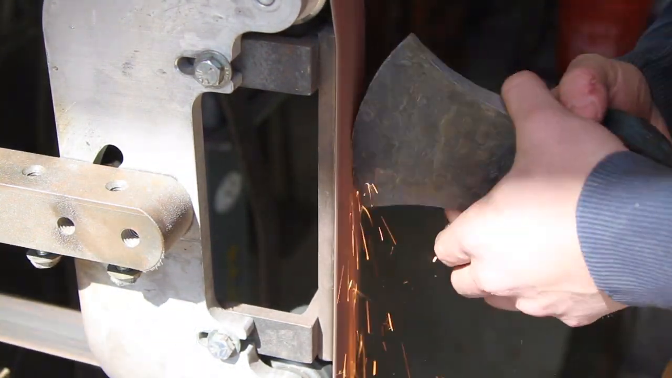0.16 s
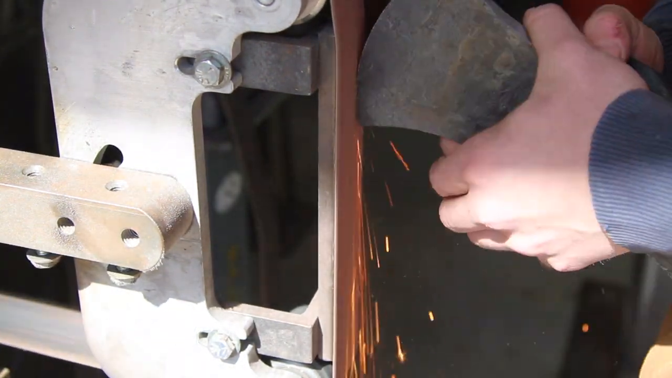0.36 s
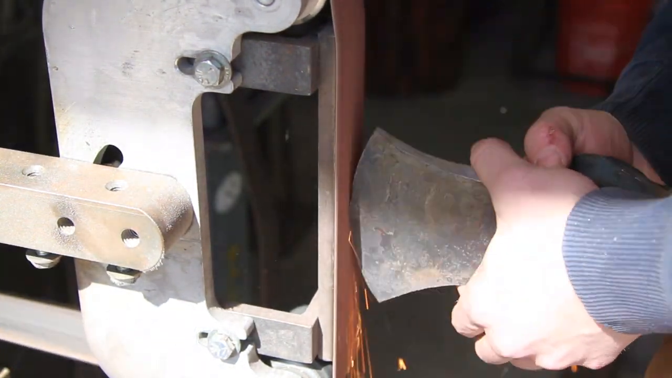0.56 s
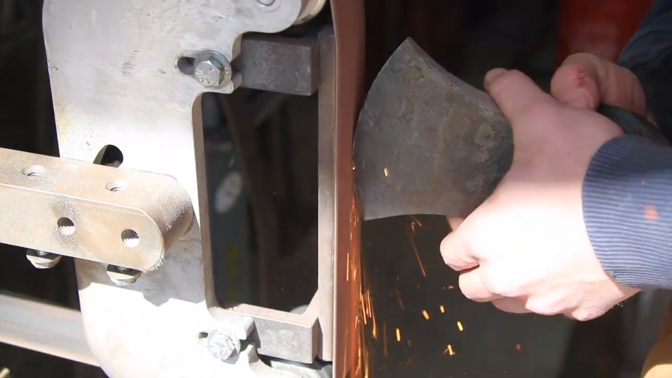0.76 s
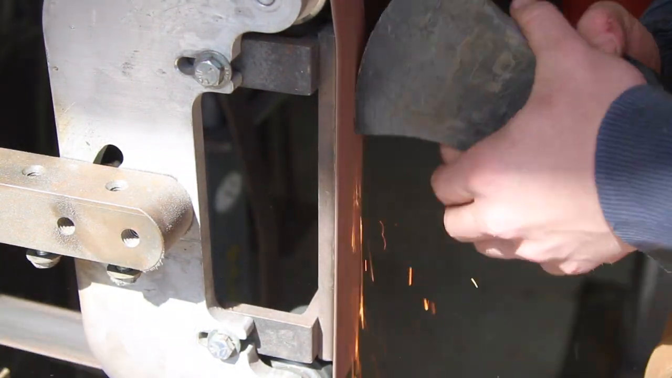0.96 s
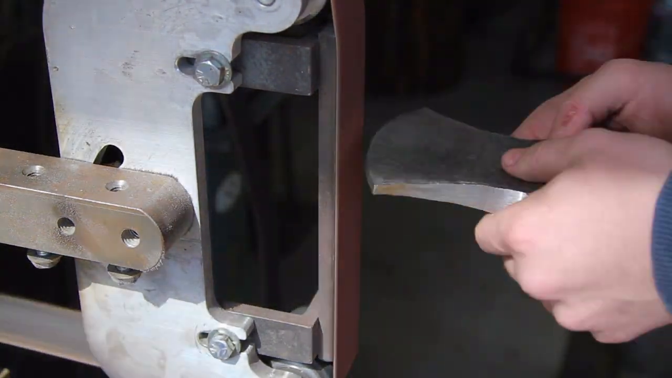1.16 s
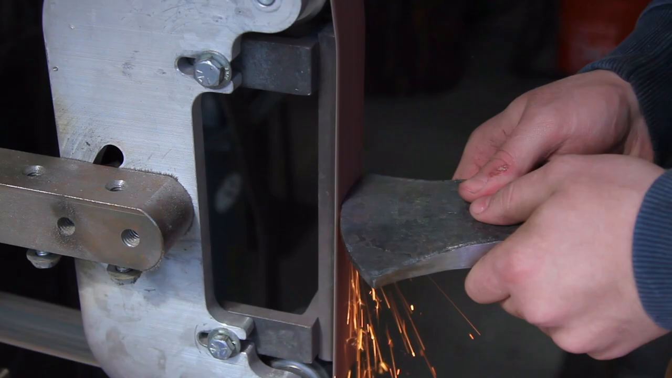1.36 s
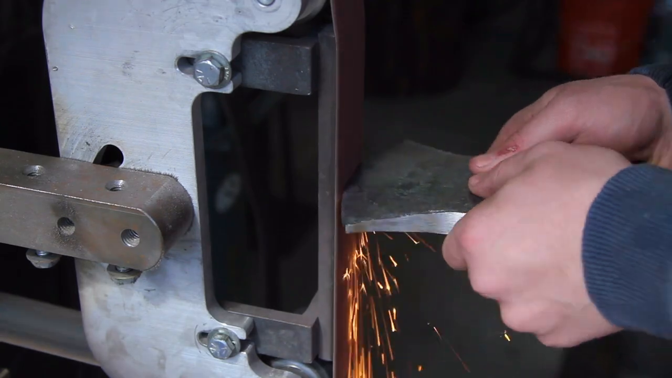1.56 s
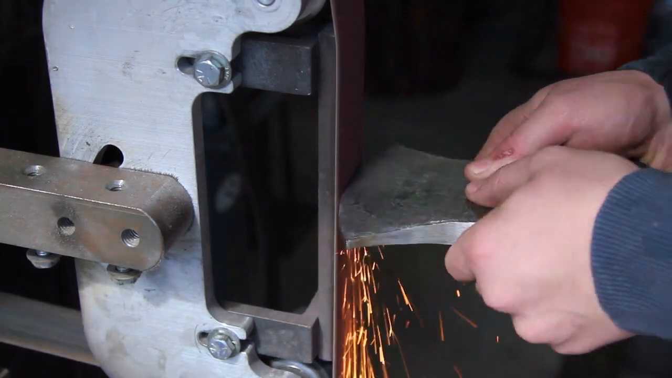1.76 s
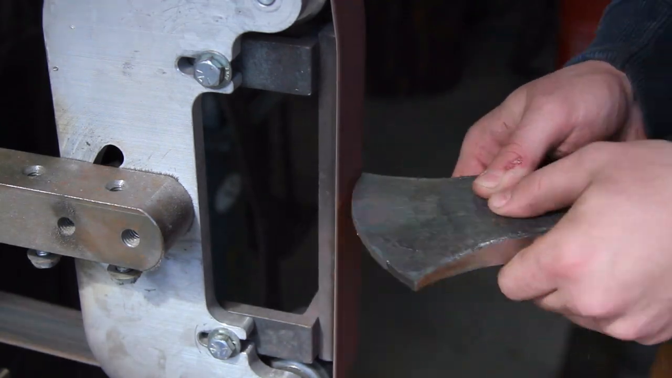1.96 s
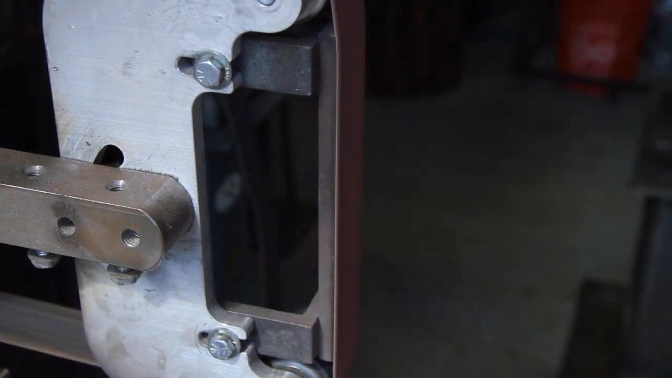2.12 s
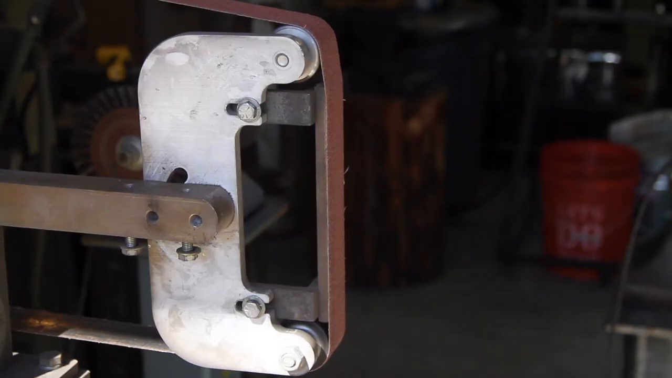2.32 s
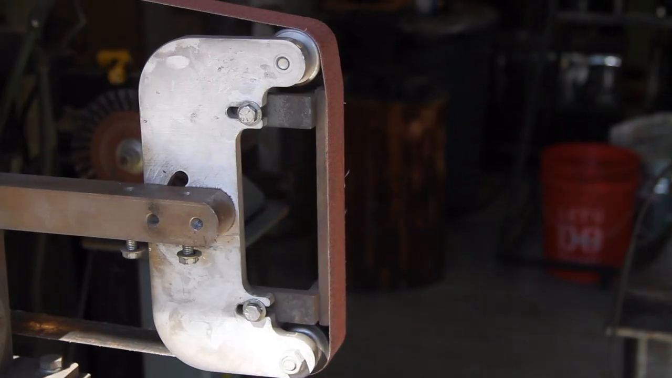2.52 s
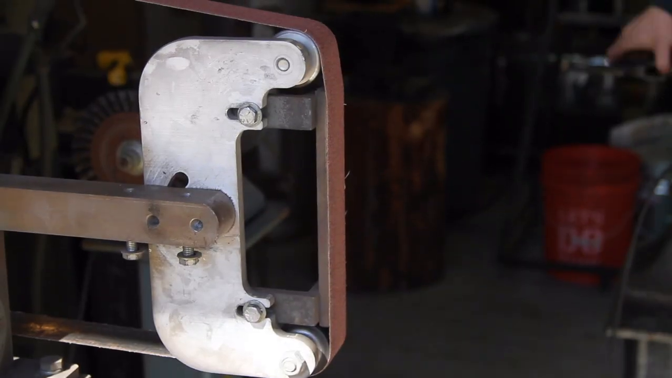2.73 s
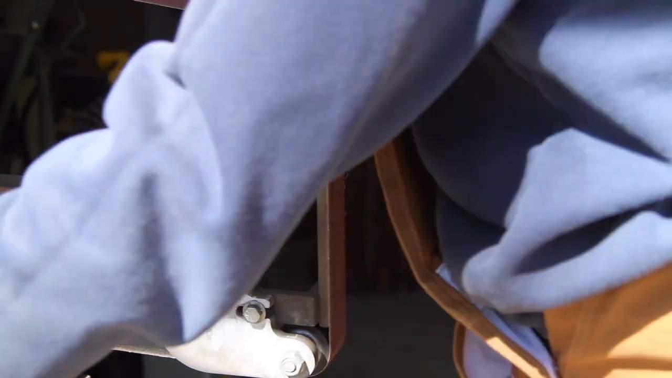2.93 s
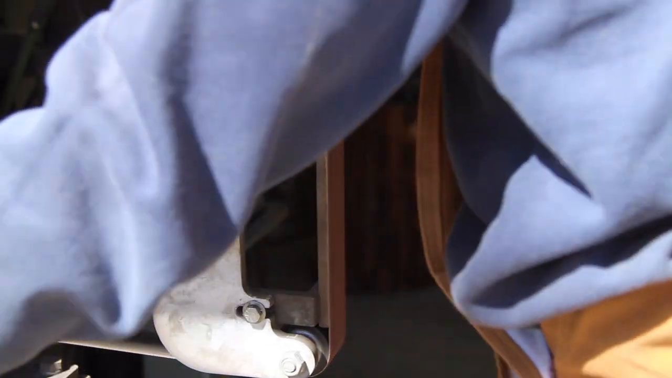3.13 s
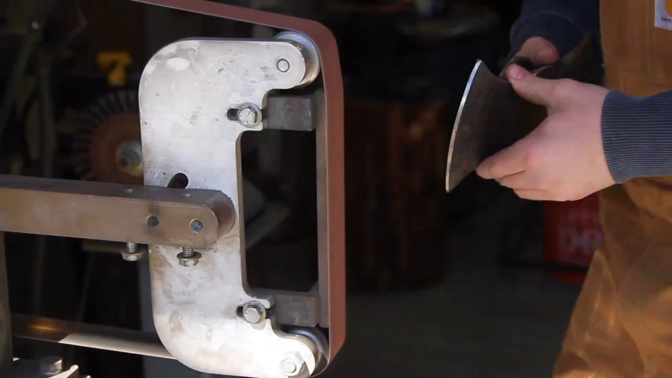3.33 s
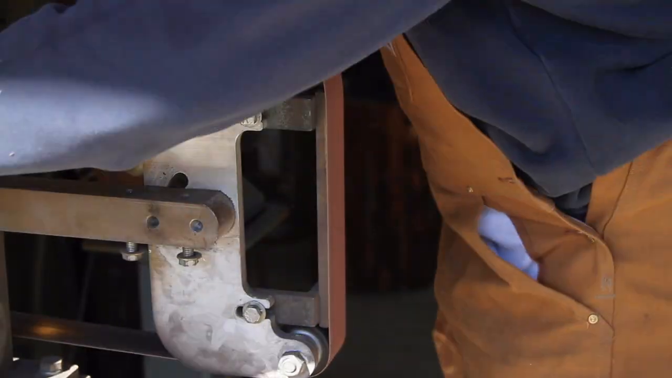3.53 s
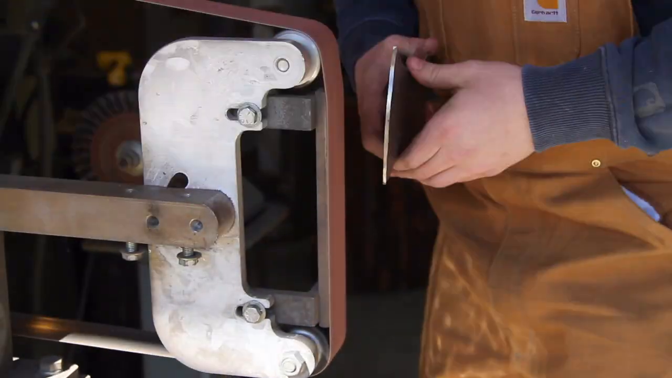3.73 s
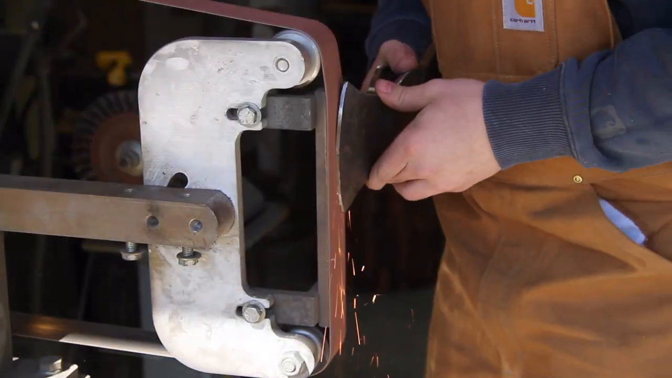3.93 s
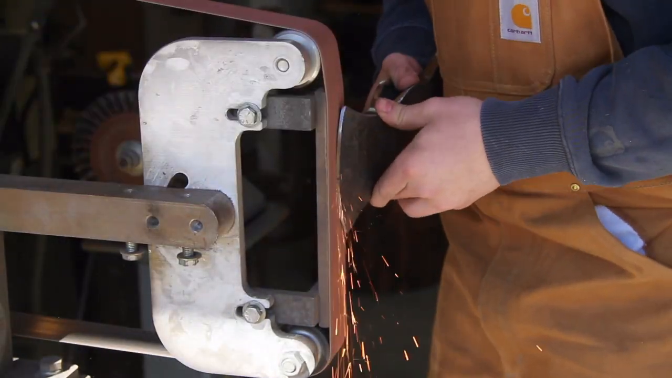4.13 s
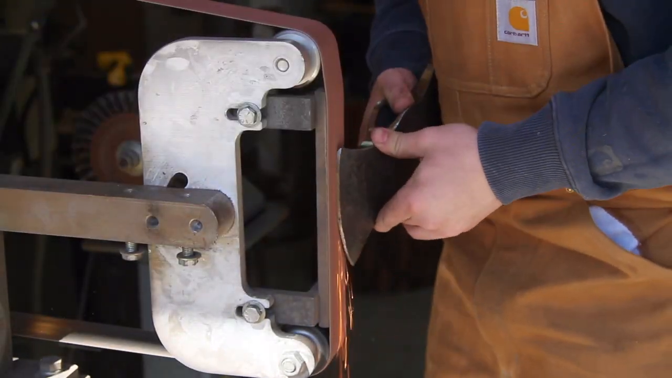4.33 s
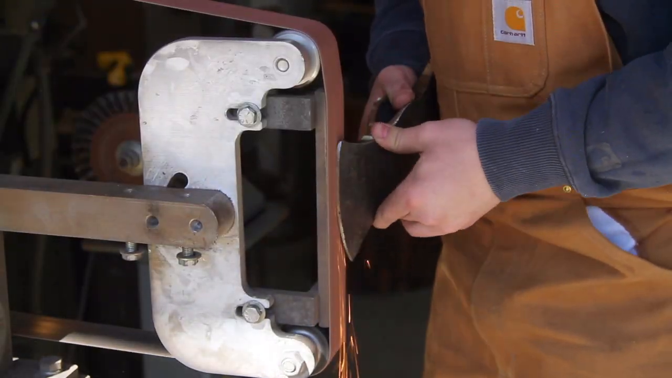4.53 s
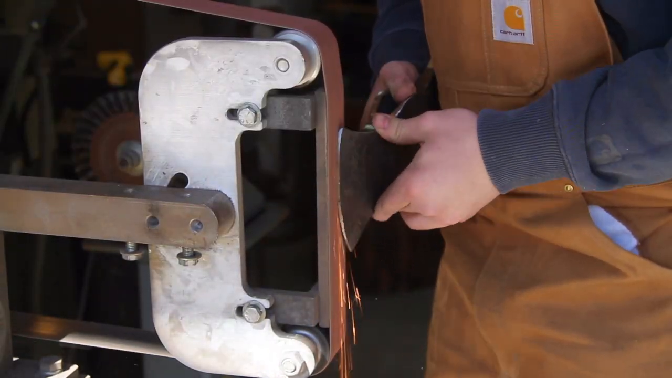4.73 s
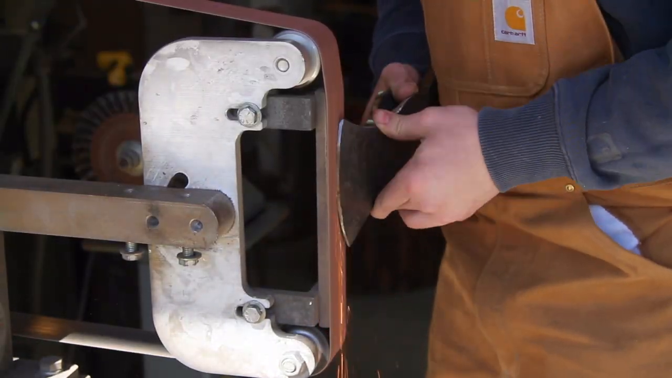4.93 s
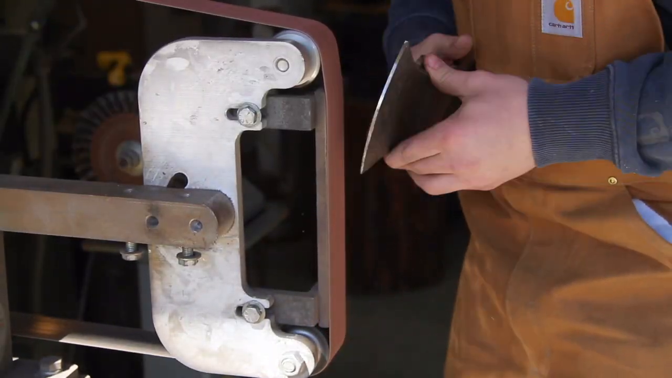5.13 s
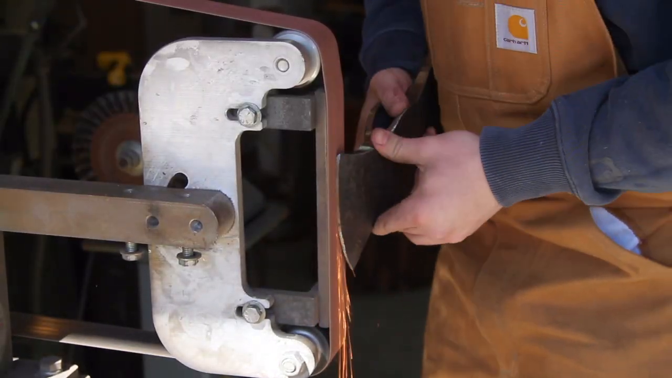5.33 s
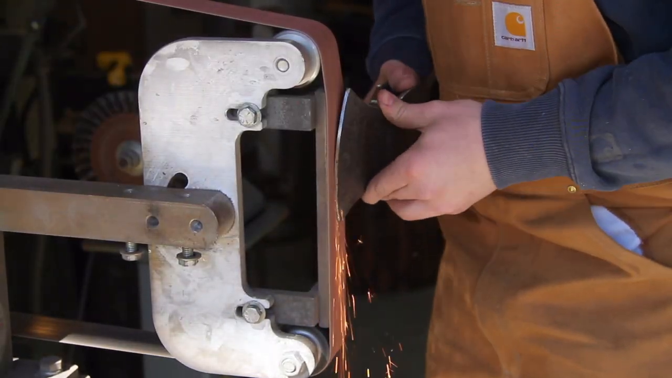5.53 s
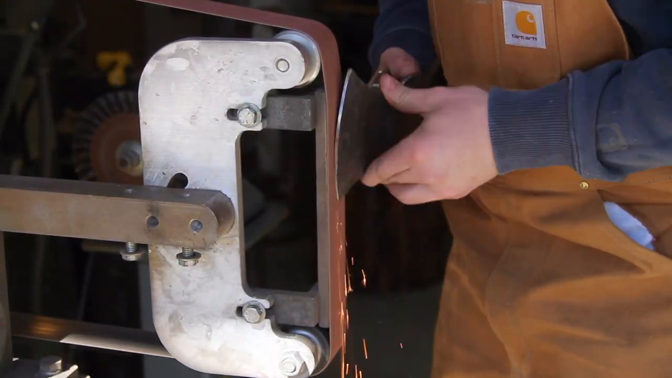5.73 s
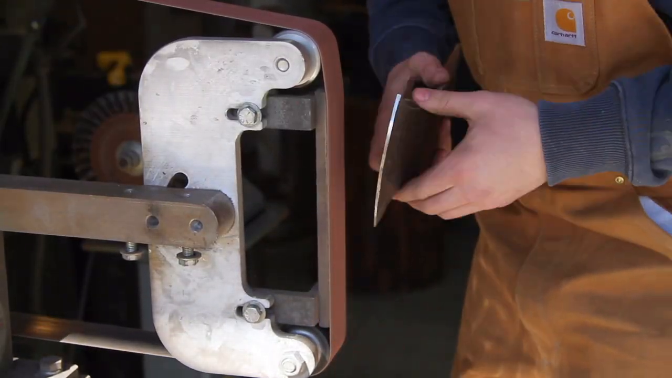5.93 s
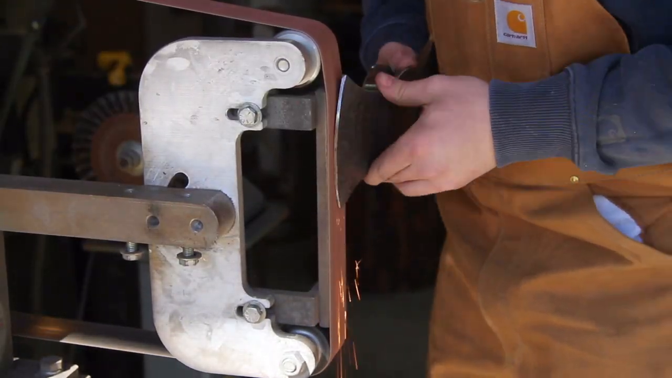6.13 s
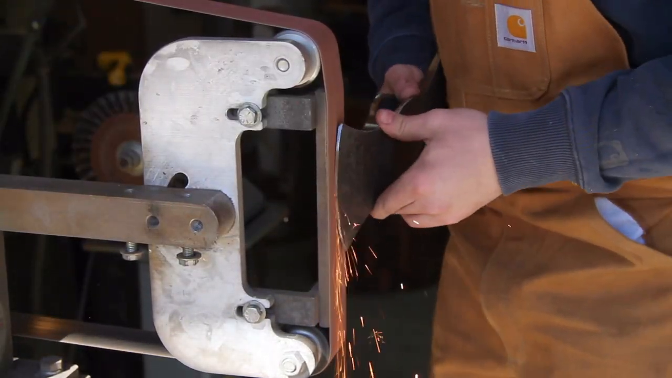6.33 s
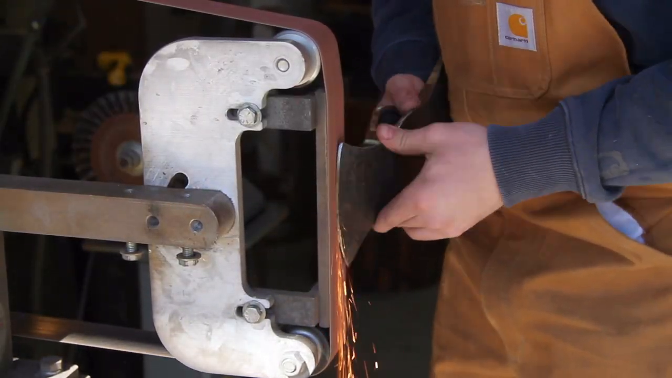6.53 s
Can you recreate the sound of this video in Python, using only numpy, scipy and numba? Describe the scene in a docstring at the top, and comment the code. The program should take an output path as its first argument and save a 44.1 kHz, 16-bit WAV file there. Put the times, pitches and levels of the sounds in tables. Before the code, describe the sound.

In an open workshop, a belt grinder runs with a steady hiss and whine while a steel axe head rasps against it in two passes. The machine cuts out, leaving faint hum, sleeve rustles and small knocks. With a click it comes back, pitched higher. A short squeal leads into more grinding, while gusts of wind rumble on the mono microphone and overload it.

```python
"""Grinding an axe head

In an open workshop, abrasive grains on a running belt excite the resonances of the grinder's frame and
of an axe head, pressed on flat and then edge-on. The motor cuts out, leaving hum, knocks and sleeve
rustle. Just after this pause, whine and resonances sound about a fourth higher. One short squeal and
more grinding follow, while gusts of wind overload the mono microphone."""
import sys
import numpy as np
from scipy import signal
from scipy.fft import rfft, irfft, next_fast_len
from scipy.io import wavfile
from scipy.ndimage import uniform_filter1d
from numba import njit

SR = 44100
rng = np.random.default_rng(int(sys.argv[2]) if len(sys.argv) > 2 else 0)


def file_out(sig):
    """Save sig as 16-bit WAV at sys.argv[1]."""
    # one column per channel
    cols = np.atleast_2d(sig).T
    # limit, then scale
    lim = np.clip(cols, -1, 1)
    pcm = np.round(lim * 32767).astype(np.int16)
    wavfile.write(sys.argv[1], SR, pcm)


N = 294145
T = np.arange(N) / SR
STOP_S, START_S, SHIFT_S = 2.306, 3.155, 3.193  # the pause begins, it ends, the sound turns higher

# Passes of the steel along the belt, in three lists: flat, edge-on and after the pause.
# Each row: start and end in seconds, first and last level in dB.
STEEL_PASSES = [
    [(.2, .27, -32, -34), (.27, .4, -29.5, -29.5), (.4, 1.105, -30.5, -29.5)],
    [(1.255, 2.025, -30, -29.5)],
    [(3.98, 4.45, -29, -33.5), (4.45, 5.1, -30, -31), (5.1, 5.8, -33, -30.5), (5.8, 6.2, -39.5, -29.5),
     (6.2, 6.7, -30.5, -28)],
]


def undb(db):
    """Amplitude ratio for a level in decibels."""
    return 10 ** (np.asarray(db) / 20)


def level(x, db):
    """The signal scaled to an rms level in dB."""
    return x * undb(db) / np.sqrt(np.mean(x ** 2))


def gain(*spans):
    """Envelope with 8 ms fades. Each span: start and end in seconds, first and last level in dB."""
    envelope = sum(undb(np.interp(T, [start, end], [first_db, last_db])) * (T >= start) * (T < end)
                   for start, end, first_db, last_db in spans)
    return uniform_filter1d(envelope, size=350)


@njit
def svf(x, hz, width):
    """Second-order resonator: a state-variable band-pass with unit gain at its moving centre."""
    y, band_state, low_state = np.empty(len(x)), 0., 0.
    for i in range(len(x)):
        g, damping = np.tan(np.pi * hz[i] / SR), width / hz[i]
        band = (band_state + g * (x[i] - low_state)) / (1 + g * (g + damping))
        band_state = 2 * band - band_state
        low_state += 2 * g * band
        y[i] = damping * band
    return y


def walk(rate):
    """Random modulation: ramps between `rate` random values a second, with a spread near 1."""
    hold = int(SR / rate)
    steps = np.repeat(rng.standard_normal(N // hold + 1), hold)
    return 1.49 * uniform_filter1d(steps, hold)[:N]


def coloured(points, x=None):
    """Spectral shaping of noise, or x, to unit rms. Each point: frequency in Hz, relative level in dB."""
    hz, db = np.transpose(points)
    x = rng.standard_normal(N) if x is None else x
    size = next_fast_len(N)
    f = np.maximum(np.arange(size // 2 + 1) * SR / size, 1.)
    response = undb(np.interp(np.log(f), np.log(hz), db))
    return level(irfft(rfft(x, size) * response, size)[:N], 0)


def grit(scatter_db, count=N):
    """Granular excitation: noise whose samples vary widely in strength, like the impacts of grains."""
    return rng.standard_normal(count) * undb(scatter_db * rng.exponential(size=count))


def ringing(modes, hiss, hiss_db, flicker_db, scatter_db):
    """Forced vibration: grains drive flickering resonances over a broad hiss; unit rms."""
    drive = grit(scatter_db)
    size = next_fast_len(N)
    f = np.arange(size // 2 + 1) * SR / size
    spectrum, out = rfft(drive, size), 0
    for hz, width, db in modes:
        mode = irfft(spectrum / (1 + (2 * (f - hz) / width) ** 2), size)[:N]
        flicker = walk(14) + 60 / width * walk(6)  # sharp resonances flare more
        out = out + undb(db + flicker_db * flicker) * mode
    return level(level(out, 0) + undb(hiss_db) * coloured(hiss, drive), 0)


def workshop():
    """Ambient noise: drifting outdoor hiss, a wavering hum and a low thump that decays after the stop."""
    # Distant hiss. Each row: frequency in Hz, relative spectrum level in dB.
    hiss_spectrum = [(25, -4.5), (80, -15.5), (141, -19), (300, -16.5), (500, -19), (820, -12.5),
                     (1500, -14), (4000, -16), (8500, -16.5), (11000, -24.5), (16000, -26)]
    # Hum. Each row: frequency in Hz, rms level in dB.
    hum_tones = [(532.9, -76), (802.6, -80)]
    hum = sum(undb(db + 3 * walk(25)) * np.sqrt(2) * np.sin(2 * np.pi * hz * T + .5 * walk(25))
              for hz, db in hum_tones)
    decay = np.where(T > STOP_S, undb(-46) * np.exp(-np.abs(T - STOP_S) / 0.057), 0)
    thump = coloured([(10, -4.0), (50, -11), (150, -18), (400, -37), (16000, -90)])
    hiss = coloured(hiss_spectrum) * undb(-60 + 1.306 * walk(4.14) + 0.87 * walk(30.77))
    return hiss + hum + decay * thump


def rustles():
    """Friction noise of a sleeve: grainy puffs of band noise under Gaussian envelopes."""
    # Each row: peak time and length in seconds, centre and bandwidth in Hz, level in dB.
    puffs = [(2.449, 0.0076, 4500, 5000, -51), (2.454, .014, 7000, 8000, -57),
             (2.473, 0.016, 400, 500, -60), (2.525, .03, 9000, 8000, -57), (2.597, .006, 7000, 9000, -45),
             (2.607, 0.014, 9500, 7000, -51), (2.657, .014, 9000, 9000, -56),
             (2.671, .005, 7000, 8000, -53), (2.725, .025, 10000, 8000, -63),
             (2.895, .015, 12000, 6000, -65), (2.925, .016, 6000, 6000, -59),
             (2.986, 0.022, 13500, 4000, -54), (3.012, .02, 14000, 5000, -55),
             (3.025, .018, 10000, 8000, -55)]
    out = np.zeros(N)
    for peak_s, length, hz, width, db in puffs:
        i = int((peak_s - .06) * SR)
        t = T[i:i + 6000] - peak_s
        puff = svf(grit(2.6, len(t)), np.full(len(t), float(hz)), float(width))
        out[i:i + len(t)] += level(puff, db) * np.exp(-(2 * t / length) ** 2 / 2)
    return out


def knocks():
    """Impact excitation: small knocks and the switch each give a tick, damped modes and a noisy tail."""
    # Each row: start in seconds, level in dB, pitch in Hz, relative level of the tick in dB.
    impacts = [(2.6197, -36, 1700, 3), (2.6415, -35.5, 1500, 1), (2.6903, -49, 2200, -3),
               (2.7005, -52, 2500, -3), (2.9512, -36.5, 1600, -9), (2.9629, -37, 2200, 4),
               (3.1552, -29, 3000, 1)]
    # Each row: multiple of the pitch, relative level in dB, time to decay by 60 dB in seconds.
    modes = [(1, -5, .012), (1.5, -7, 0.009), (2.3, -6, .009)]
    out, t = np.zeros(N), T[:3000]
    for start, db, hz, tick_db in impacts:
        noise = rng.standard_normal(len(t))
        ring = sum(undb(mode_db - 60 * t / t60) * np.sin(2 * np.pi * ratio * hz * t)
                   for ratio, mode_db, t60 in modes)
        tick = svf(noise, np.full(len(t), 5000.), 7000.) * undb(tick_db - 60 * t / .005)
        tail = svf(noise, np.full(len(t), 1.1 * hz), 2500.) * undb(-3 - 60 * t / 0.065)
        i = int(start * SR)
        out[i:i + len(t)] += undb(db) * (ring + tick + tail)
    bass_cut = signal.butter(2, 550, "high", fs=SR, output="sos")  # small bodies radiate little bass
    return signal.sosfilt(bass_cut, out)


def wind():
    """Turbulence: eddies at the microphone port give a fluttering rumble and a brighter rush."""
    # Each row: peak time in seconds, level in dB, rise and fall in seconds, brightness in dB.
    gusts = [(3.455, -47, 0.031, 0.045, -3), (3.79, -34, 0.035, 0.037, -19),
             (3.89, -35.5, 0.039, 0.043, -15), (4.2, -41, 0.11, 0.038, -4),
             (4.25, -32.5, 0.018, 0.039, -0.5), (4.31, -21.5, 0.054, 0.1, -10),
             (4.395, -28, 0.054, 0.032, 7.5), (4.435, -24.5, 0.029, 0.052, -5),
             (4.507, -34.5, 0.013, 0.016, 7), (4.55, -34.5, 0.035, 0.086, -2),
             (4.65, -32.5, 0.11, 0.095, -18), (4.77, -38.5, 0.088, 0.081, -1),
             (4.889, -22.5, 0.021, 0.025, -10), (5.001, -31, 0.033, 0.055, -20),
             (5.056, -23, 0.017, 0.021, -6.5), (5.13, -25.5, 0.067, .06, -9), (5.25, -32, 0.057, 0.099, -9),
             (5.362, -32.5, 0.027, 0.03, -17), (5.515, -29.5, .06, 0.086, -2.5),
             (5.72, -49.5, 0.024, 0.15, 0), (6.02, -42, 0.043, 0.034, -8)]
    edge_db = 11.5  # drop in level one rise before or one fall after the peak
    flutter = undb(2.6 * walk(90))
    rumble = coloured([(20, 1), (100, 1.5), (450, 0.1), (900, -8.5), (1800, -21), (4000, -45),
                       (16000, -70)])
    rush = coloured([(200, -32), (700, 7), (1200, 3.0), (2000, -6.5), (3500, -18), (16000, -60)])
    rumble_gain, rush_gain = 0, 0
    for peak_s, peak_db, rise, fall, bright_db in gusts:
        db = peak_db - edge_db * np.abs((T - peak_s) / np.where(T < peak_s, rise, fall)) ** 1.32
        rumble_gain += undb(db)
        rush_gain += undb(db + bright_db + np.minimum(0.82 * (db + 40), 0))  # the rush grows faster
    return flutter * (rumble_gain * rumble + rush_gain * rush)


def squeal():
    """Frequency modulation: a short gliding tone roughens into scraping noise on the same pitch."""
    # Each row: time in seconds, pitch in Hz, level in dB.
    glide = [(3.909, 1830, -35), (3.914, 1850, -32), (3.931, 1840, -32), (3.936, 1700, -40),
             (3.944, 1480, -35), (3.955, 1330, -36), (3.965, 1420, -43), (3.977, 1750, -40),
             (3.985, 1800, -47)]
    times, pitches, db = np.transpose(glide)
    hz = np.interp(T, times, pitches)
    sounding = (T >= times[0]) * (T < times[-1])
    envelope = uniform_filter1d(undb(np.interp(T, times, db)) * sounding, size=350)
    roughness = np.interp(T, [3.925, 3.94], [.4, .88])
    jittered_hz = hz * (1 + .04 * roughness * walk(400))
    tone = np.sqrt(2) * np.sin(2 * np.pi * np.cumsum(jittered_hz) / SR)
    scrape = level(svf(svf(rng.standard_normal(N), hz, 700.), hz, 700.), 0)
    shimmer = undb(4 * roughness * walk(300))
    return envelope * (np.sqrt(1 - roughness ** 2) * shimmer * tone + roughness * scrape)


def harmonics(hz, orders):
    """Harmonic series: multiples of one frequency, each wavering a little in strength."""
    return sum(undb(db + 1.4 * walk(9.7)) * np.sqrt(2) * np.sin(2 * np.pi * (k * hz * T + rng.random()))
               for k, db in orders)


def motor_whine():
    """Periodic vibration: a whine of harmonic tones, heard a fourth higher after the pause."""
    # Each row: harmonic number, relative level in dB.
    low_orders = [(1, -10), (3, -3), (4, -0.5), (5, -3)]
    high_orders = [(3, -3.5), (4, 0.5), (5, -2), (6, -4), (7, -3), (9, -13), (11, -11)]
    # Envelopes of the low whine (louder once the steel lifts off), the high whine and its fundamental.
    # Each row: start and end in seconds, first and last level in dB.
    low_spans = [(0, 1.25, -48, -48.5), (1.25, 2.09, -53, -51), (2.09, 2.3, -44.5, -46)]
    high_spans = [(3.198, 6.7, -47, -47)]
    fundamental_spans = [(3.22, 3.85, -52.5, -58), (3.85, 5.82, -59, -60), (5.82, 6.7, -60, -60)]
    low_hz, high_hz = 799.1, 1065.6
    low = gain(*low_spans) * harmonics(low_hz, low_orders)
    high = gain(*high_spans) * harmonics(high_hz, high_orders)
    fundamental = undb(2.2 * walk(6.6)) * np.sqrt(2) * np.sin(2 * np.pi * high_hz * T)
    return low + high + gain(*fundamental_spans) * fundamental


def rings():
    """Narrow-band resonance: grains excite single sharp modes of steel and frame, flaring at random."""
    # Each row: centre and bandwidth in Hz, start and end in seconds, first and last level in dB.
    sharp_modes = [(4440, 220, .26, 1, -40, -49), (4440, 130, .92, .97, -38, -33),
                   (9550, 110, 1.6, 2.03, -53, -45), (12900, 500, 1.6, 1.98, -41, -41),
                   (3215, 59, 2.09, 2.3, -39, -43), (3060, 350, 3.157, 3, -44, -42),
                   (2938, 29, 3.2, 3.9, -54, -46), (2940, 40, 5.4, 6.6, -53, -51)]
    out = 0
    for hz, width, *span in sharp_modes:
        centre, width = np.full(N, float(hz)), float(width)
        flare = gain(span) * undb(1.5 * walk(rate=22))
        ring = svf(svf(grit(1.7), centre, width), centre, width)
        out += flare * level(ring, 0)
    return out


def belt_roar():
    """Broadband excitation: the running belt drives the resonances of the frame and wheels."""
    # Resonances before and after SHIFT_S. Each row: centre and width in Hz, relative level in dB.
    low_modes = [(2173, 19, 2), (3060, 47, 3.5), (4000, 34, -9), (5470, 40, 5), (10780, 90, 2),
                 (2270, 500, -35), (2950, 300, -17.5), (3840, 380, 1.5), (4600, 380, 1.5), (5370, 860, 1.5),
                 (6700, 680, 2.5), (7840, 500, -7), (8500, 400, -5), (9450, 720, 0.5), (10750, 400, 1),
                 (11800, 400, 3), (13100, 630, 2), (14000, 560, -1), (15100, 760, 5)]
    high_modes = [(4036, 40, 8), (4430, 27, -1), (5500, 59, 2), (7700, 33, -4), (14420, 60, 5),
                  (15500, 50, 7), (1130, 200, -34), (2910, 260, -15), (3940, 480, 2), (4360, 230, -18),
                  (5600, 450, -4), (6230, 390, -1.5), (7450, 690, -0.5), (7970, 420, -7), (9550, 370, -3.5),
                  (10400, 420, -7.5), (11800, 600, -4.5), (13250, 590, 2), (14500, 610, 4.5),
                  (15100, 450, 9)]
    # Hiss beneath them. Each row: frequency in Hz, relative spectrum level in dB.
    low_hiss = [(15, -41), (25, -8.5), (489, -10.5), (796, -9), (1290, -10), (3160, -2.5), (3430, -5),
                (14400, -8), (16000, -31)]
    high_hiss = [(15, -34), (25, -3.5), (249, -5.5), (363, -9.5), (2280, -10), (3920, -3), (8590, -5),
                 (14800, -4), (16000, -23)]
    low_db, high_db, edge_drop_db = -28.1, -26.5, -1.5
    restart_db, overshoot_db, peak_s, settle_s = -39, 5.5, 3.206, 0.014
    low = ringing(low_modes, low_hiss, hiss_db=0.1, flicker_db=0.9, scatter_db=1.85)
    high = ringing(high_modes, high_hiss, hiss_db=0.1, flicker_db=1.6, scatter_db=1.0)
    edge_start, edge_end = STEEL_PASSES[1][0][:2]
    edge_on = (T > edge_start) & (T < edge_end)  # the roar is slightly quieter during this pass
    first_run = undb(low_db + edge_drop_db * edge_on)
    climb = undb(np.interp(T, [START_S, peak_s], [restart_db, high_db + overshoot_db])) * (T >= START_S)
    settle = undb(high_db + overshoot_db * np.exp(-np.abs(T - peak_s) / settle_s))
    envelope = np.select([T < STOP_S, T < peak_s], [first_run, climb], settle)
    return envelope * np.where(T < SHIFT_S, low, high)


def axe_head():
    """Modal response: grains ring the steel while it touches the belt, higher-pitched after the pause."""
    # Resonances of the steel. Each row: centre and width in Hz, relative level in dB.
    flat = [(995, 34, 0), (6400, 62, -2), (8200, 70, -6), (8000, 60, 3), (1000, 100, -16), (2100, 280, -11),
            (2850, 280, 0.5), (4320, 450, 4), (5170, 420, 0), (6600, 600, 5), (7600, 400, -0.5),
            (8500, 440, -1), (9500, 500, -1), (11000, 660, -1), (13300, 600, -4)]
    edge_on = [(4400, 70, -3), (6545, 70, 0), (4500, 270, -10), (5350, 310, -7), (6570, 340, -14),
               (8030, 300, -1), (9470, 210, 9), (10800, 500, -6), (11550, 400, 0), (13100, 1000, 7),
               (13700, 350, -4)]
    after_pause = [(1120, 33, -10), (3970, 78, -12), (2790, 130, -1.5), (3950, 1200, -2), (4800, 600, -3.5),
                   (6000, 460, 1), (7600, 700, -4), (8740, 420, -2), (9300, 290, 1), (10300, 260, -2.5),
                   (11960, 420, -3), (14260, 450, 3), (15200, 450, 3.5)]
    # Hiss of abrasion. Each row: frequency in Hz, relative spectrum level in dB.
    hiss = [(15, -39), (25, -5), (2280, -3), (3920, -17), (5000, -7.5), (11000, 1), (14800, -18.5),
            (16000, -5.5)]
    steel = sum(gain(*passes) * ringing(modes, hiss, hiss_db=-1.1, flicker_db=2.9, scatter_db=2.2)
                for passes, modes in zip(STEEL_PASSES, (flat, edge_on, after_pause)))
    hand_pressure = undb(0.75 * walk(rate=12))
    return steel * hand_pressure


def grinder():
    """Amplitude modulation: belt and steel throb, and the level dips briefly at times."""
    # Each row: start in seconds, depth in dB, hold and recovery in seconds.
    dips = [(0.393, 1, .02, 0.035), (0.713, 1, 0.033, 0.051), (0.995, 1.5, 0.017, .04),
            (1.253, 3, 0.037, .03), (1.928, 3.5, 0.077, .006), (3.906, 7, 0.012, 0.058),
            (4.477, 3, 0.026, .02), (5.09, 1.5, .1, .08), (5.23, 2.5, .05, .05), (5.8, 0.7, 0.081, 0.16)]
    fall_s = 0.0087
    dip_db = sum(np.interp(T - start, np.cumsum([0, fall_s, hold, recovery]), [0, db, db, 0])
                 for start, db, hold, recovery in dips)
    throb = undb(0.62 * walk(40))  # wheels and belt seam run slightly out of true
    return undb(-dip_db) * (throb * (belt_roar() + axe_head()) + motor_whine() + rings())


def scene():
    """Superposition: all sources add at one microphone, which feeds both channels."""
    mono = grinder() + squeal() + wind() + knocks() + rustles() + workshop()
    return np.array([mono, mono])


def record(dry):
    """Saturation: the input stage flattens gust peaks, sits slightly off zero and cuts the top treble."""
    ceiling, offset, top_hz = .155, .0015, 15750
    clipped = dry / (1 + (dry / ceiling) ** 6) ** (1 / 6) + offset
    return signal.sosfilt(signal.ellip(14, .2, 92, top_hz, fs=SR, output="sos"), clipped)


dry = scene()
out = record(dry)
file_out(out)
```